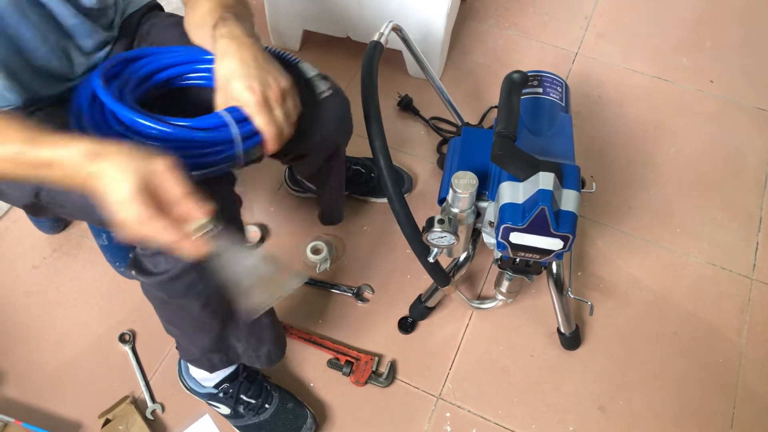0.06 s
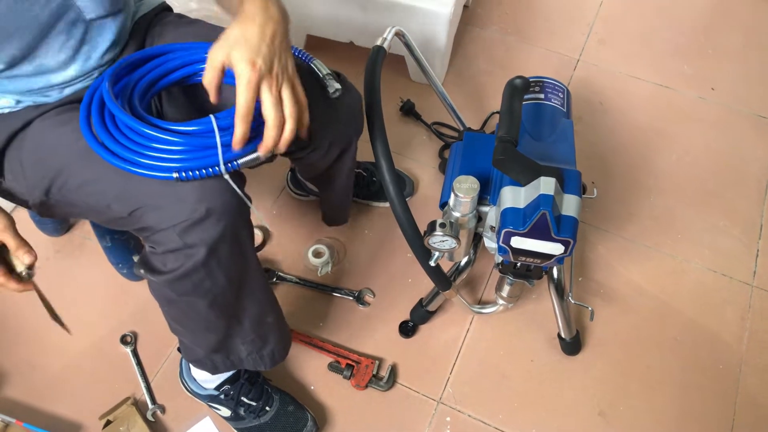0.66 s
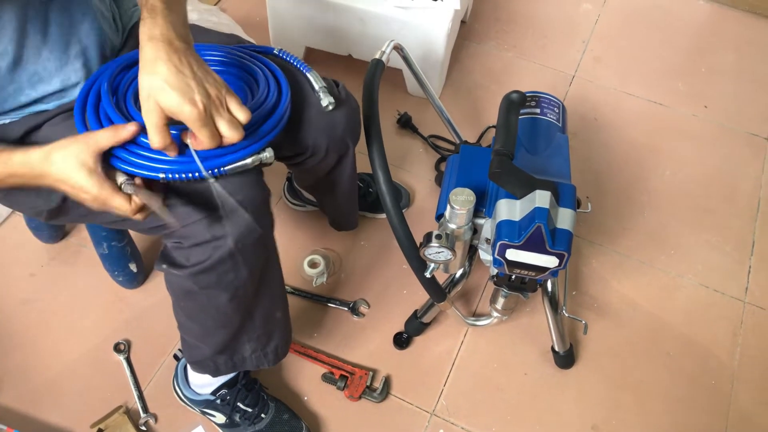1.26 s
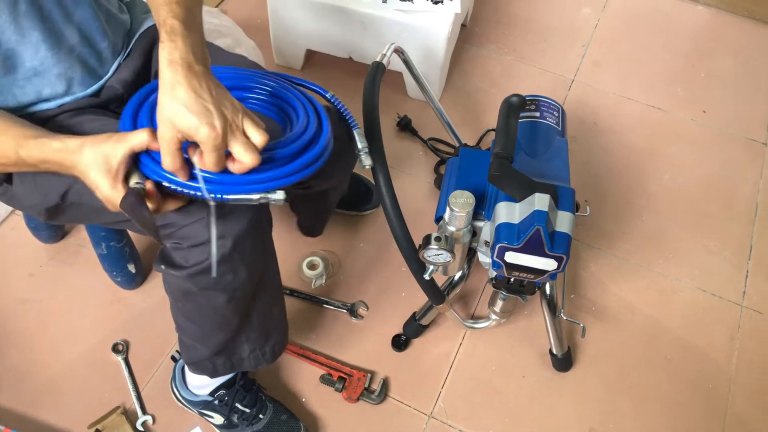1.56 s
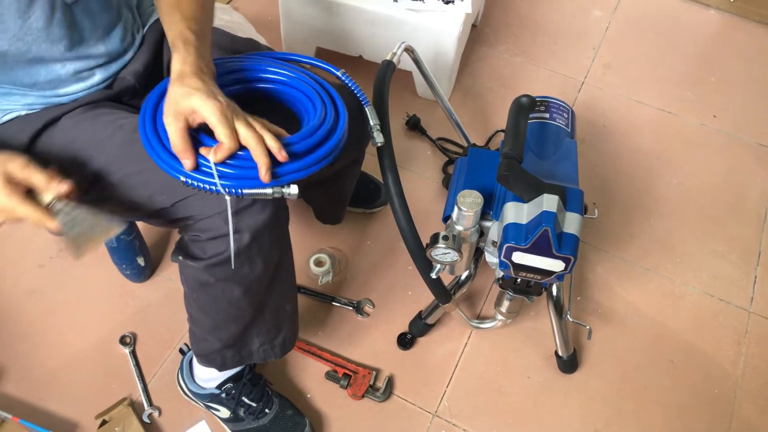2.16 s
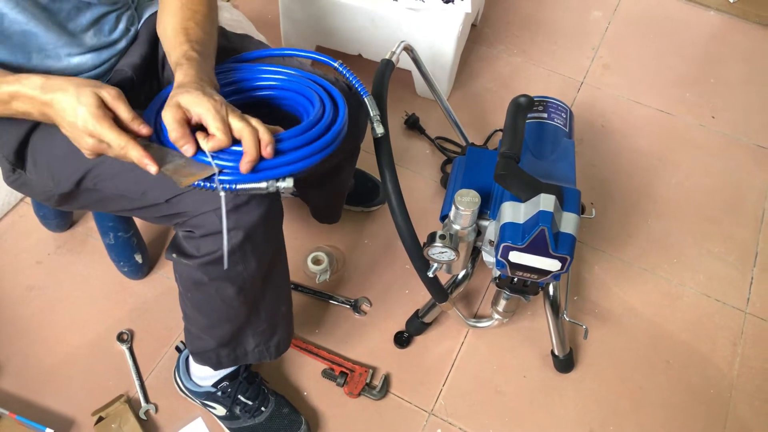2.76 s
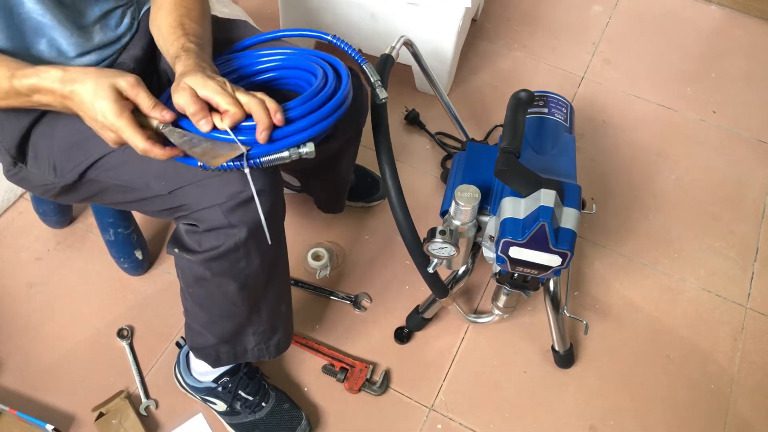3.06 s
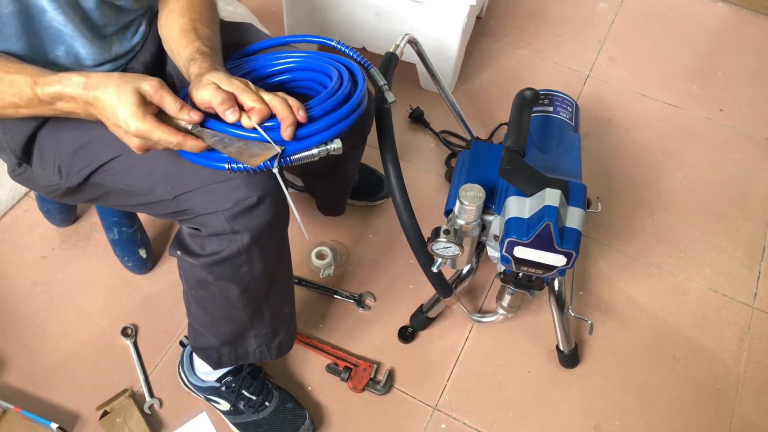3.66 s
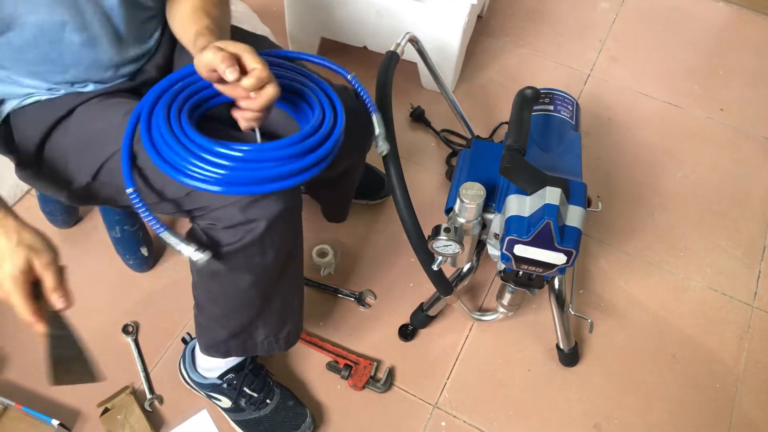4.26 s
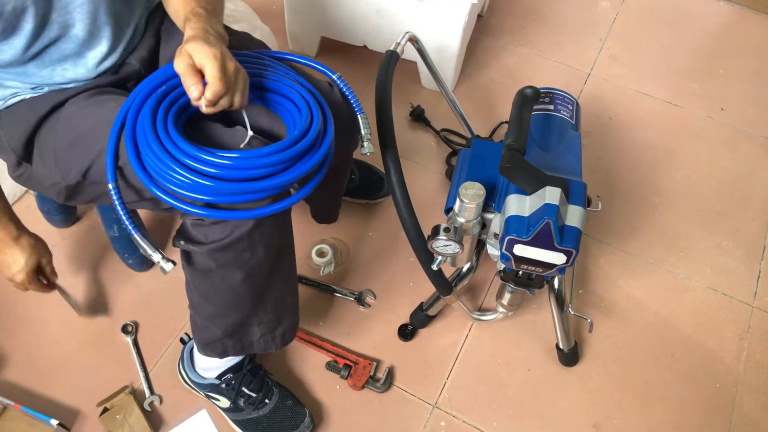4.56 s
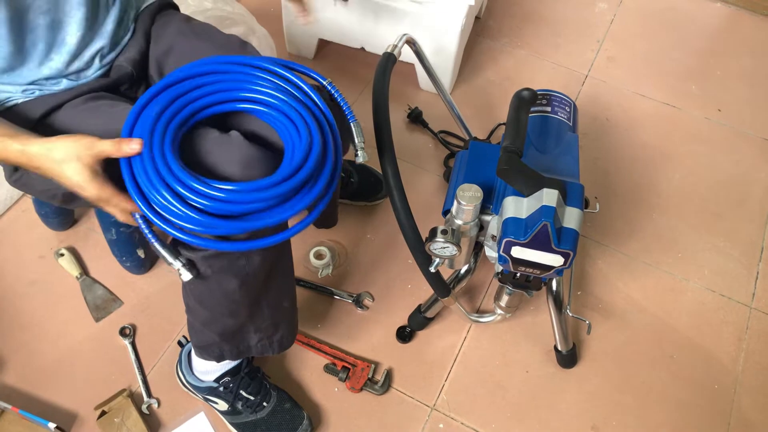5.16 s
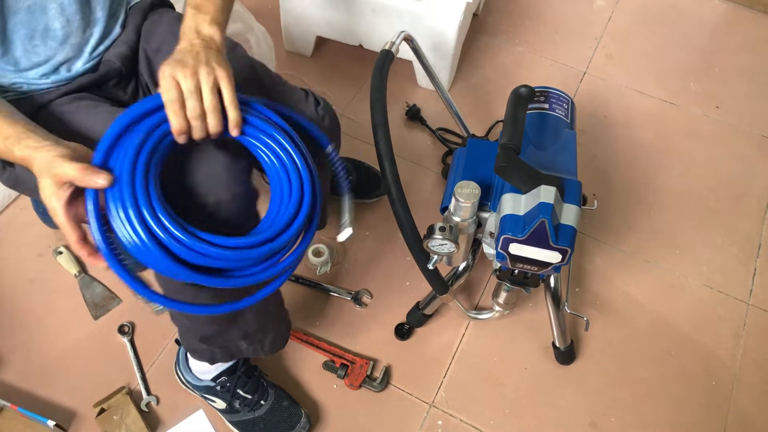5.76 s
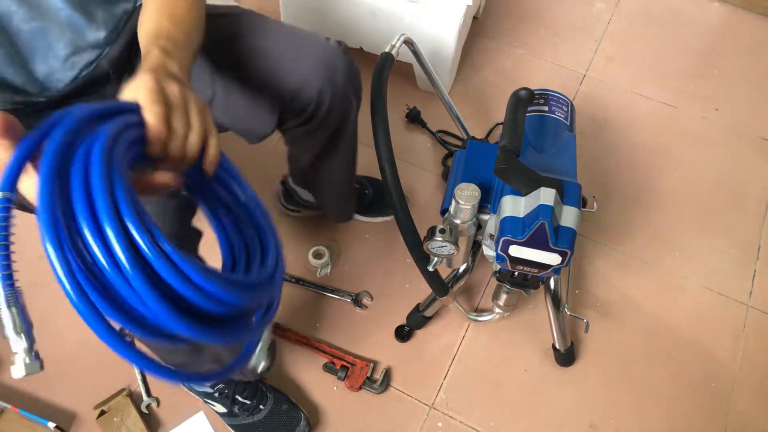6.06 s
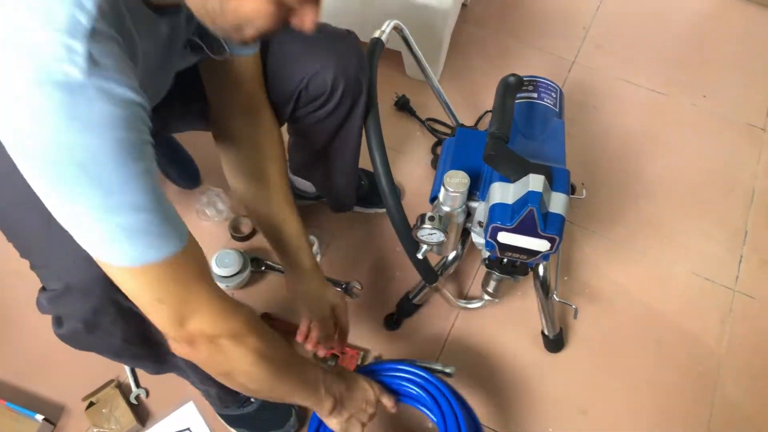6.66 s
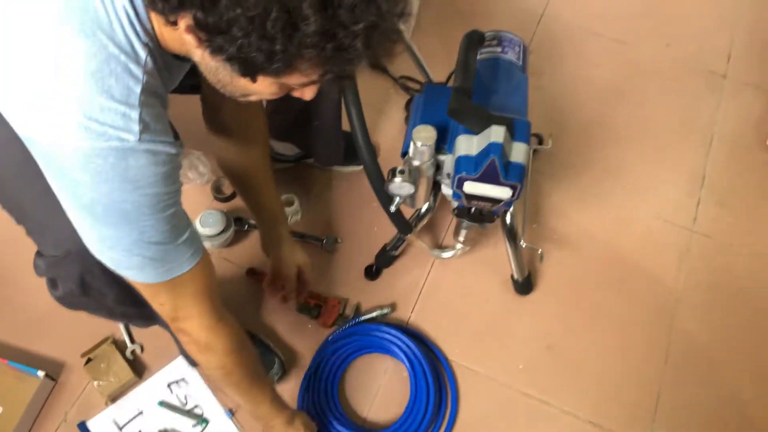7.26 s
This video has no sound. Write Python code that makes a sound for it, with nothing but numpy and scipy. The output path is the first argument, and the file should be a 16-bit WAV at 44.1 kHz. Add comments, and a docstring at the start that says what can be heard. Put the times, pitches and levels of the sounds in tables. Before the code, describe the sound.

A steel scraper rings faintly at the start, close by in a small, quiet tiled room. For nearly four seconds a coiled hose rubs softly over trousers and hands, with a brief groan, light bumps and tiny plastic ticks. At about 3.9 seconds the scraper snaps a plastic tie, and at 4.2 the coil springs loose with strong, dull thumps on a knee. From 4.6 to 5.1 the dropped scraper cracks against the floor, rebounds and rings brightly. Around 5.3 the hose turns knock together hollowly and settle. Between 5.5 and 6.8 they rub and give short, unsteady groans as the coil is lifted. At about 6.9 the metal couplings begin to clatter on the tiles, and at 7.1 one gives a high ring, the loudest sound, overloading the microphone. Faint rubbing continues until about 7.5 seconds.

```python
"""A steel scraper rings faintly and a coiled hose rubs and groans on a knee, in a small tiled room.
The scraper snaps the plastic tie and the coil springs loose with soft thumps. Dropped on the floor,
the blade cracks, rebounds and rings; the hose turns knock hollowly and stick-slip as the coil is lifted.
The coil is laid down: its metal couplings clatter on the tiles, one ringing loudly enough to overload
the microphone."""
import sys
import numpy as np
from scipy import signal
from scipy.fft import rfft, irfft
from scipy.io import wavfile

SR = 44100
rng = np.random.default_rng(int(sys.argv[2]) if len(sys.argv) > 2 else 0)


def generate_wav(sig):
    """Save sig (samples, or channels by samples) to the path in sys.argv[1] as 16-bit PCM at SR."""
    pcm = np.round(np.clip(np.atleast_2d(sig).T, -1, 1) * 32767).astype(np.int16)
    wavfile.write(sys.argv[1], SR, pcm)


N = 331191
T = np.arange(N) / SR

# blade modes: (frequency [Hz], level [dB], t60 [s])
BLADE_MODES = [(1178, -7.5, 0.31), (1540, -17.5, 0.39), (1647, -20.5, .3), (2200, 1, 0.17),
               (2990, -12.5, 0.26), (3304, -2, 0.48), (4253, -18.5, 0.2), (4500, -11.5, .38),
               (4637, -9, 0.19), (5570, -20, .35), (6025, -0.5, 0.28), (6205, -9, 0.87), (7800, 8.5, 0.58)]
# blows on the blade: (time [s], crack [dB], ring [dB], leading mode [Hz], its lift [dB])
BLADE_BLOWS = [(.001, -32.5, -32.5, 3304, 12), (3.9335, -24.5, -39.5, 2200, 17.5),
               (3.972, -25, -39.5, 2200, 20.5), (4.6295, -24, -23.5, 1178, 9.5),
               (4.75, -19.5, -29, 1178, 15), (4.8394, -10, -27, 4253, 21), (4.862, -20.5, -21, 3304, 8),
               (4.919, -21, -24, 4637, 14), (4.955, -39, -29, 2200, 12.5), (5.017, -31.5, -29.5, 4253, 2),
               (5.058, -40, -41, 1178, 15), (5.112, -42, -46.5, 1178, 24)]
# steel on tile or plastic: (frequency [Hz], level [dB])
CRACK_SPECTRUM = [(60, -31.5), (250, -9), (500, -9.5), (900, -3.5), (1250, -3), (1600, 5.5), (1900, -2),
                  (2700, -1.5), (3500, -0.5), (4300, -1.5), (5200, -1), (6300, 7), (7500, 0)]
# coupling modes: (frequency [Hz], level [dB], t60 [s])
COUPLING_MODES = [(1670, -48, 0.31), (1890, -27, 0.17), (3340, -29.5, 0.39), (3383, -15.5, 0.12),
                  (3800, -37, 0.19), (4457, -27, 0.18), (5744, -21, 0.15), (6414, -2.5, 0.15),
                  (6425, -27.5, 0.46), (7150, -29.5, 0.11)]
# couplings landing: (time [s], clack [dB], ring [dB])
COUPLING_BLOWS = [(6.899, -45.5, -58.5), (6.984, -34, -54.5), (6.998, -23, -46), (7.0055, -10.5, -27.5),
                  (7.0321, -11, -7.5), (7.0605, -12.5, -24.5), (7.123, -18, 9.5)]
# coupling on tile: (frequency [Hz], level [dB])
CLACK_SPECTRUM = [(60, -26), (150, -12.5), (240, -8), (400, -15), (800, -2.5), (1250, 0.5), (1640, 6.5),
                  (1900, -0.5), (2600, -7), (3400, 0.5), (4000, 1), (5400, -4.5), (6200, -1), (6650, 6),
                  (7400, 1)]
# hose and hands on the knee: (time [s], level [dB], pitch [Hz])
KNEE_THUMPS = [(.323, -29.5, 310), (1.403, -37, 307), (2.856, -40, 71), (2.939, -36, 68), (3.354, -37, 74),
               (4.163, -6, 257), (4.2089, -2, 270), (4.243, -12, 226.5), (6.134, -33, 198),
               (6.217, -27, 356)]
# coil shifting and being grabbed: (time [s], level [dB], pitch [Hz])
COIL_KNOCKS = [(4.165, -18.5, 444), (4.206, -22.5, 602), (5.3335, -16, 403), (5.3425, -11, 482),
               (5.3625, -10.5, 505), (5.369, -10, 630), (6.37, -32.5, 672)]
# struck hose wall: (frequency [Hz], level [dB])
WALL_SPECTRUM = [(60, -30.5), (150, -14), (265, 5), (380, 3.5), (620, 7.5), (800, -3.5), (1100, -3),
                 (1350, -17), (1580, -3), (1900, -26.5), (2400, -42), (7000, -59.5)]
# hollow ring of the hose: (frequency [Hz], level [dB], t60 [s])
HOSE_MODES = [(255.7, -7, 0.37), (270, 1, 0.38), (391, -12, 1), (492, -14.5, 1), (573, -11.5, 0.25),
              (658, -7.5, 0.42), (773, -13.5, .6), (1615, -9.5, .35)]
# turn dragging over turn: (start [s], length [s], level [dB], pitch [Hz])
GROAN_BOUTS = [(0.246, 0.12, -38.5, 542), (2.99, 0.098, -52.5, 524), (4.091, 0.067, -33.5, 742),
               (4.484, 0.046, -35, 400), (5.5, 0.3, -29.5, 571.3), (5.823, 0.047, -35, 720),
               (5.946, .05, -40.5, 726), (6.131, 0.11, -31, 709), (6.348, .13, -31.5, 680),
               (6.362, 0.44, -29, 449.8)]
# tie and hose sleeve: (time [s], level [dB], tilt [dB/octave])
PLASTIC_TICKS = [(1.814, -57.5, 11), (2.235, -47.5, 5), (2.461, -47.5, -7), (2.765, -53, -2),
                 (4.1676, -28, 6.5), (4.204, -28, 13.5), (4.2506, -31.5, 4), (4.493, -39.5, -7.5),
                 (5.483, -37, -7.5), (6.549, -43.5, -6)]
# hard plastic: (frequency [Hz], level [dB])
TICK_SPECTRUM = [(80, -13), (400, -11), (1100, -8), (1580, 15.5), (2000, -2.5), (3500, 0.5), (4800, -8.5),
                 (6500, -5), (7500, -12.5)]
# hose over cloth and skin: (start [s], length [s], relative rub [dB], relative hiss [dB])
RUB_STROKES = [(0, 0.11, -47.5, -70.5), (0.245, 0.097, -50, -58), (1.35, .08, -43, -64),
               (1.477, 0.092, -50.5, -58.5), (2.226, 0.05, -46.5, -70), (2.93, 0.083, -50.5, -70),
               (4.306, .35, -50.5, -59.5), (5.313, 0.12, -41.5, -61), (5.587, 0.34, -50.5, -62.5),
               (6.118, .1, -40.5, -51), (6.341, 0.065, -38, -50), (6.4, 0.042, -40, -45),
               (6.58, 0.44, -54, -64.5), (7.34, 0.22, -50, -57.5)]
# low friction noise: (frequency [Hz], level [dB])
RUB_SPECTRUM = [(50, -9), (140, 4), (320, -0.5), (600, -8), (1050, -5.5), (1350, -8), (1600, -4),
                (2200, -19.5), (5000, -24)]
# high friction noise: (frequency [Hz], level [dB])
HISS_SPECTRUM = [(500, -21), (1800, -9), (3000, -3), (4600, 3), (6500, 8.5), (7500, -16.5)]
# still room: (frequency [Hz], level [dB])
AIR_SPECTRUM = [(15, -44.5), (28, -9.5), (70, -3.5), (130, -0.5), (240, -2), (400, -5.5), (550, -6.5),
                (850, -13.5), (1400, -22), (1660, -19.5), (2100, -23), (2900, -21.5), (7000, -28.5),
                (9000, -61.5)]
# diffuse decay: (frequency [Hz], t60 [s])
TAIL_T60 = [(100, 0.69), (250, 0.71), (550, 0.72), (1200, 0.33), (3000, 0.62), (7000, 0.34)]
# standing waves between the walls: (frequency [Hz], level [dB], t60 [s])
STANDING_MODES = [(197, -1.5, 0.2), (218, -5.5, 0.58), (250, -2, 1), (277.3, 2.5, 0.18), (306, -6.5, 0.43),
                  (429, -3.5, 0.34), (540, -3.5, 0.96), (602, -9.5, 0.47), (648, 0.5, 0.38)]

MIC_HZ, TOP_HZ = 7150, 16000


def undb(db):
    """Decibels to gain."""
    return 10 ** (np.asarray(db) / 20)


def unit(x):
    """Scale to rms 1."""
    return x / np.sqrt(np.mean(x ** 2))


def fade(t, t60_s):
    """Gain falling 60 dB per t60_s."""
    return np.exp(-np.log(1000) * t / t60_s)


def at(points, hz):
    """Interpolate (frequency [Hz], value) points on a log axis."""
    f, value = np.transpose(points)
    return np.interp(np.log(np.maximum(hz, 1)), np.log(f), value)


def add(track, time_s, sound):
    """Mix a sound in at time_s."""
    i = max(int(time_s * SR), 0)
    track[i:i + len(sound)] += sound[:N - i]


def noise(spectrum):
    """Coloured noise, rms 1."""
    gain = undb(at(spectrum, np.fft.rfftfreq(N, 1 / SR)))
    return unit(irfft(rfft(rng.standard_normal(N)) * gain, N))


def walk(rate_hz):
    """Random wander, spread near 1."""
    knots = np.arange(0, T[-1] + 1, 1 / rate_hz)
    return np.interp(T, knots, rng.standard_normal(len(knots)))


def ring(modes, lift_db=0, detune=0):
    """One second of decaying modes."""
    hz, db, t60_s = np.transpose(modes)
    t = T[:SR]
    hz = hz * (1 + detune * rng.standard_normal(len(hz)))
    return undb(db + lift_db) @ (np.sin(2 * np.pi * np.outer(hz, t)) * fade(t, t60_s[:, None]))


def contact(spectrum, tilt_db_oct, decay_s, grit, hz, lift_db=0, width_oct=0.2, size=4096):
    """A push and a dying spray of micro-contacts, coloured by the struck body."""
    f = np.maximum(np.fft.rfftfreq(size, 1 / SR), 20)
    octaves = np.log2(f / hz)
    db = at(spectrum, f) + tilt_db_oct * np.maximum(octaves, -2)
    db += lift_db / (1 + (octaves / width_oct) ** 2)
    db -= 20 * np.log10(1 + (f / MIC_HZ) ** 8)
    cepstrum = irfft(np.log(undb(db)))
    cepstrum[1:size // 2] *= 2
    cepstrum[size // 2 + 1:] = 0  # causal: nothing sounds before the blow
    spray = rng.standard_normal(size) * np.exp(-T[:size] / decay_s)
    push = grit * spray / np.linalg.norm(spray)
    push[0] += 1
    blow = irfft(rfft(push) * np.exp(rfft(cepstrum)))
    return blow / np.linalg.norm(blow) * np.sqrt(SR / 100)  # energy of 10 ms at rms 1


def scraper(let_go_s=4.5, flat_s=5.12, rebound_s=0.014, touch_db=-2.7):
    """Each blow cracks, damps the blade and rings it anew; the contact point picks the leading mode."""
    cracks, rings = np.zeros((2, N))
    blows = [(s, crack_db, ring_db, 0, hz, lift_db) for s, crack_db, ring_db, hz, lift_db in BLADE_BLOWS]
    # the springy blade strikes again, weaker and brighter
    blows += [(s + rebound_s, crack_db - 6, ring_db - 5.5, 6, 2200, 12)
              for s, crack_db, ring_db, _, _ in BLADE_BLOWS]
    mode_hz = np.array(BLADE_MODES)[:, 0]
    touches_s = np.sort(np.array(blows)[:, 0])
    for s, crack_db, ring_db, tilt_db_oct, lead_hz, lead_db in blows:
        held = s < let_go_s  # in the hand: duller, damped, dragging
        tilt_db_oct -= 4.5 * held
        decay_s, lift_share = (0.03, 0.41) if held else (0.0072, 0.73)
        crack = contact(CRACK_SPECTRUM, tilt_db_oct, decay_s, grit=7.9, hz=lead_hz,
                        lift_db=lift_share * lead_db, width_oct=0.13)
        add(cracks, s, undb(crack_db) * crack)
        lift_db = (1.5 + tilt_db_oct) * np.log2(mode_hz / 3000)
        lift_db[np.argmin(abs(mode_hz - lead_hz))] += lead_db
        later_touches = np.searchsorted(touches_s[touches_s > s], s + T[:SR])
        damping = undb(touch_db * later_touches) * fade(held * T[:SR], t60_s=1.3)
        add(rings, s, undb(ring_db) * damping * ring(BLADE_MODES, lift_db, detune=0.001))
    rings *= fade(np.maximum(T - flat_s, 0), t60_s=0.12)  # at rest, flat on the tile
    return (room(cracks, wet_db=-2.5, build_s=0.0011, standing_db=-79)
            + room(rings, wet_db=-7.5, build_s=0.0096))


def couplings(chatter_s=0.007, chatter_db=-4):
    """Metal ends clack on tile, damped by the hose; one bounces free and rings."""
    clacks, rings = np.zeros((2, N))
    for s, clack_db, ring_db in COUPLING_BLOWS:
        tilt_db_oct = 5.5 + 0.3 * ring_db  # freer is brighter
        for late_s, edge_db in (0, 0), (chatter_s, chatter_db):  # both edges of the nut land
            clack = contact(CLACK_SPECTRUM, tilt_db_oct, decay_s=0.0053, grit=3.5, hz=1590,
                            lift_db=4.5, width_oct=0.12)
            add(clacks, s + late_s, undb(clack_db + edge_db) * clack)
        add(rings, s, undb(ring_db) * ring(COUPLING_MODES))
    return room(clacks, wet_db=-5, build_s=0.007) + room(rings, wet_db=-13.5, build_s=0.01)


def thumps(decay_cycles=0.36):
    """Soft blows on the knee, a cycle or two each; a small body radiates little below its pitch."""
    out, t = np.zeros(N), T[:SR // 5]
    for s, db, hz in KNEE_THUMPS:
        decay_s = decay_cycles / hz
        push = t / decay_s * np.exp(1 - t / decay_s) * np.sin(2 * np.pi * hz * t)
        highpass = signal.butter(2, hz / 2, "high", fs=SR, output="sos")
        add(out, s, undb(db) * signal.sosfilt(highpass, push))
    return room(out, wet_db=-7, build_s=0.019, standing_db=-63)


def coil_knocks(firm_tilt_db_oct=-1.05, firm_contact_s=0.0035, hollow_db=-16, low_cut_hz=90):
    """Turns knock and ring hollow; longer contacts scuff more."""
    out = np.zeros(N)
    firm = [(s, db, hz, firm_tilt_db_oct, firm_contact_s) for s, db, hz in COIL_KNOCKS]
    for s, db, hz, tilt_db_oct, contact_s in firm + list(settling()):
        knock = contact(WALL_SPECTRUM, tilt_db_oct, contact_s, grit=contact_s / 0.0085, hz=hz,
                        lift_db=11.5, width_oct=0.31)
        add(out, s, undb(db) * knock)
        add(out, s, undb(db + hollow_db) * ring(HOSE_MODES, detune=0.0096))
    highpass = signal.butter(2, low_cut_hz, "high", fs=SR, output="sos")
    return room(signal.sosfilt(highpass, out), wet_db=-6.5, build_s=0.013, standing_db=-69)


def settling(start_s=5.386, first_db=-16, fade_db_per_s=57.5, pitch_hz=448, tilt_db_oct=2):
    """Knocks of turns settling after the grab: ever sparser, weaker and longer in contact."""
    gaps_s = 0.017 * 1.2 ** np.arange(6)
    for late_s, gap_s in zip(np.cumsum(gaps_s) - gaps_s, gaps_s):
        hz = pitch_hz * np.exp(0.12 * rng.standard_normal())
        contact_s = 0.49 * gap_s
        yield start_s + late_s, first_db - fade_db_per_s * late_s, hz, tilt_db_oct, contact_s


def groans(slip_s=0.062, duty=0.93, fade_db_per_s=53, scatter=0.0713, jitter=0.11, overtone_db=-17):
    """Stick-slip between turns: short unsteady tones, weakening as the strain eases."""
    out = np.zeros(N)
    wander, grip = walk(220), undb(4 * walk(130))
    for start_s, length_s, db, hz in GROAN_BOUTS:
        count = max(round(length_s / slip_s), 1)
        period_s = length_s / count
        for late_s in period_s * np.arange(count):
            s = start_s + late_s
            span = slice(int(s * SR), int((s + duty * period_s) * SR))
            pitch_hz = hz * (1 + scatter * rng.standard_normal() + jitter * wander[span])
            phase = 2 * np.pi * np.cumsum(pitch_hz) / SR
            slip = grip[span] * (np.sin(phase) + undb(overtone_db) * np.sin(2 * phase))
            swell = np.sin(np.linspace(0, np.pi, len(slip)))
            add(out, s, undb(db - fade_db_per_s * late_s) * unit(slip) * swell)
    return room(out, wet_db=-10.5, build_s=0.0043)


def ticks(snap_s=3.9335, snap_db=-18.5):
    """Short snaps of hard plastic; the breaking tie is the sharpest."""
    out = np.zeros(N)
    snap = contact(TICK_SPECTRUM, tilt_db_oct=-3, decay_s=0.001, grit=1.9, hz=2000)
    add(out, snap_s, undb(snap_db) * snap)
    for s, db, tilt_db_oct in PLASTIC_TICKS:
        add(out, s, undb(db) * contact(TICK_SPECTRUM, tilt_db_oct, decay_s=0.0035, grit=2.7, hz=2000))
    return room(out, wet_db=-6.5, build_s=0.0021, standing_db=-78)


def rubbing(attack_s=0.031, release_s=0.052, gain_db=-4):
    """The hose catches and slips over trousers and palms in grainy strokes."""
    rub_gain, hiss_gain = undb(-62), undb(-71.5)  # the coil is never quite still
    for s, length_s, rub_db, hiss_db in RUB_STROKES:
        attack = np.clip((T - s) / attack_s, 0, 1)
        stroke = attack * np.exp(-np.clip(T - s - length_s, 0, 1) / release_s)
        rub_gain = np.maximum(rub_gain, undb(rub_db) * stroke)
        hiss_gain = np.maximum(hiss_gain, undb(hiss_db) * stroke)
    catch = undb(1.2 * walk(45) + 3.3 * walk(350))
    slide = catch * (noise(RUB_SPECTRUM) * rub_gain + noise(HISS_SPECTRUM) * hiss_gain)
    return undb(gain_db) * room(slide, wet_db=-9.5, build_s=0.0035, standing_db=-74)


def air(tone_db=-52.5, whirr_db=-67.5, whirr_hz=1650, whirr_width=0.07):
    """Quiet room tone with a faint narrow whirr."""
    band_hz = whirr_hz * (1 + whirr_width * np.arange(-2, 3))
    whirr = noise(np.c_[band_hz, [-60, -12, 0, -12, -60]])
    return noise(AIR_SPECTRUM) * undb(tone_db + 0.5 * walk(6)) + undb(whirr_db) * whirr


def room(dry, wet_db, build_s, standing_db=-85):
    """Direct sound, standing waves and a diffuse tail building up between the tiles."""
    t = T[:SR]
    f = np.fft.rfftfreq(SR, 1 / SR)
    white = rfft(rng.standard_normal(SR))
    centres_hz = np.geomspace(60, 8000, 9)
    tail = np.zeros(SR)
    for hz, share in zip(centres_hz, np.eye(len(centres_hz))):
        band = irfft(white * at(np.c_[centres_hz, share], f), SR)
        tail += band * fade(t, at(TAIL_T60, hz))
    tail *= 1 - np.exp(-(t / build_s) ** 2)
    response = undb(wet_db) * tail / np.linalg.norm(tail) + undb(standing_db) * ring(STANDING_MODES)
    return dry + signal.fftconvolve(dry, response)[:N]


def scene():
    """All sources in mono, heard from above the knee."""
    return (scraper() + couplings() + thumps() + coil_knocks() + groans() + ticks() + rubbing()
            + air())[None]


def record(dry, ceiling=0.84):
    """Narrow-band microphone: rounds loud peaks, clips the loudest."""
    rounded = dry / (1 + (dry / ceiling) ** 4) ** 0.25
    narrow = signal.sosfilt(signal.cheby1(12, 0.3, MIC_HZ, fs=SR, output="sos"), rounded)
    clipped = np.clip(narrow, -1, 1)
    return signal.sosfilt(signal.ellip(8, 0.2, 70, TOP_HZ, fs=SR, output="sos"), clipped)


dry = scene()
out = record(dry)
generate_wav(out)
```